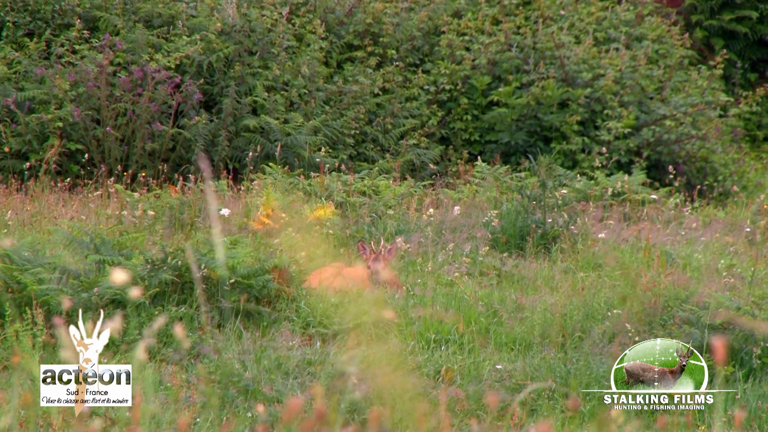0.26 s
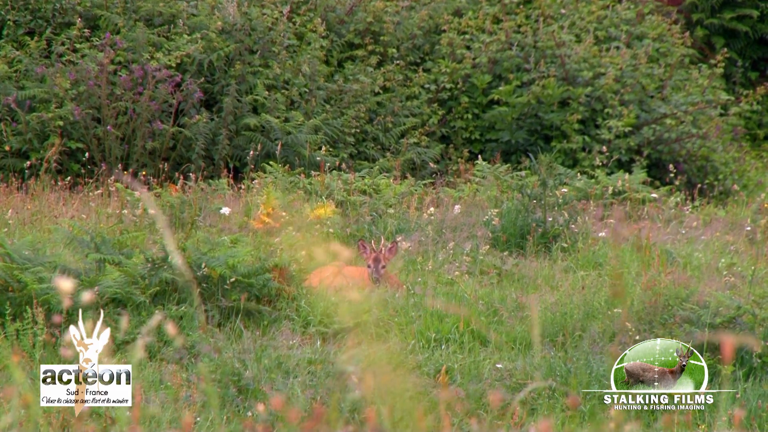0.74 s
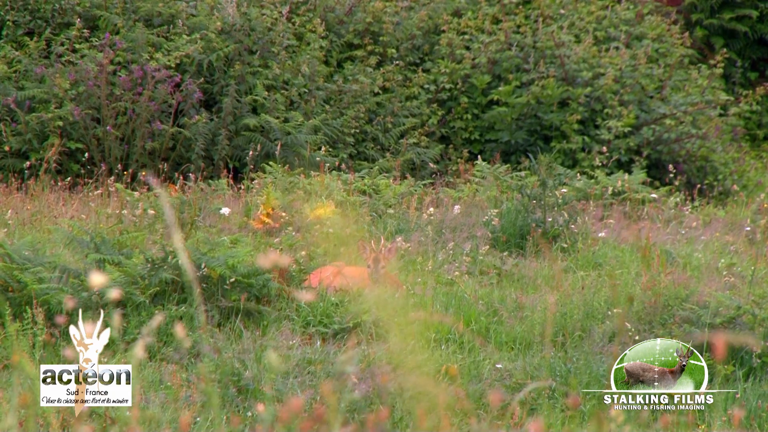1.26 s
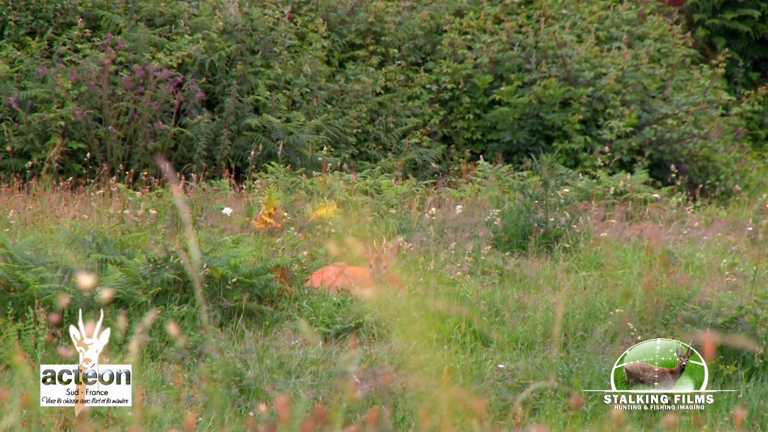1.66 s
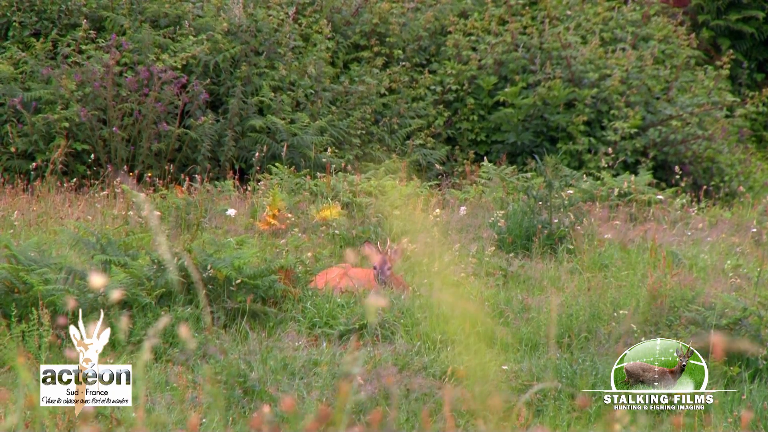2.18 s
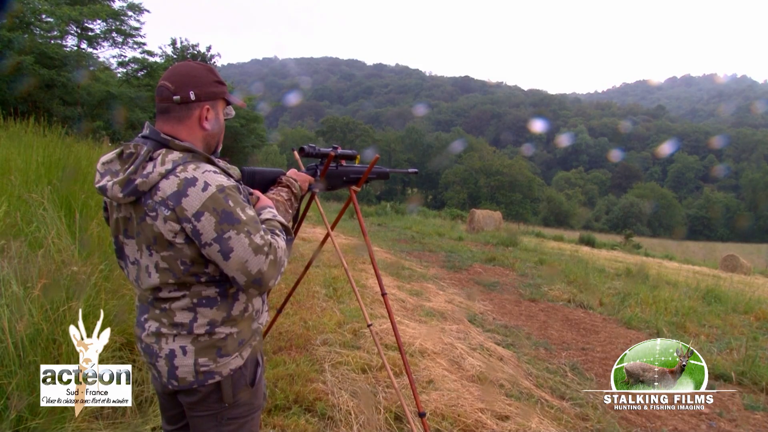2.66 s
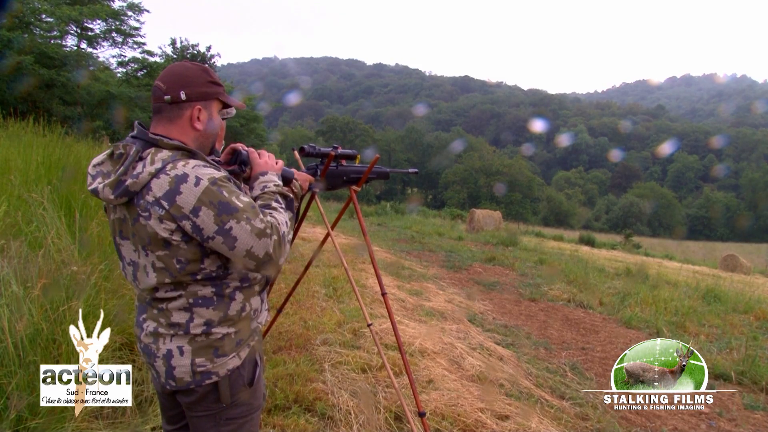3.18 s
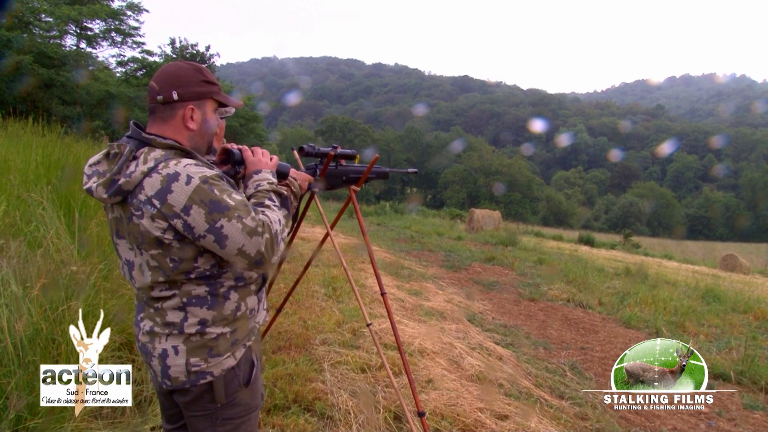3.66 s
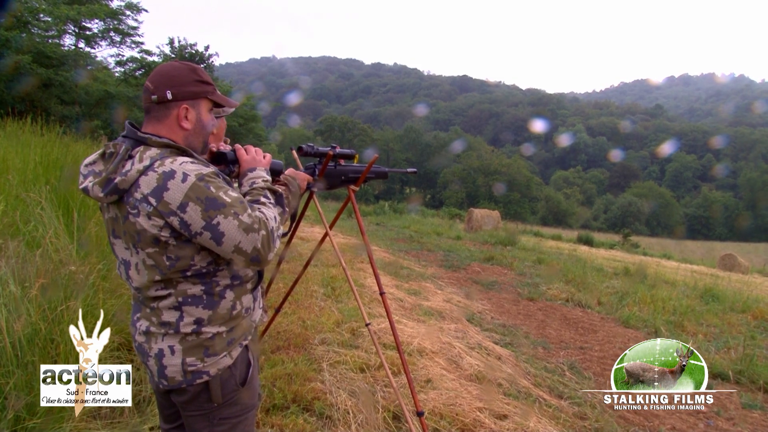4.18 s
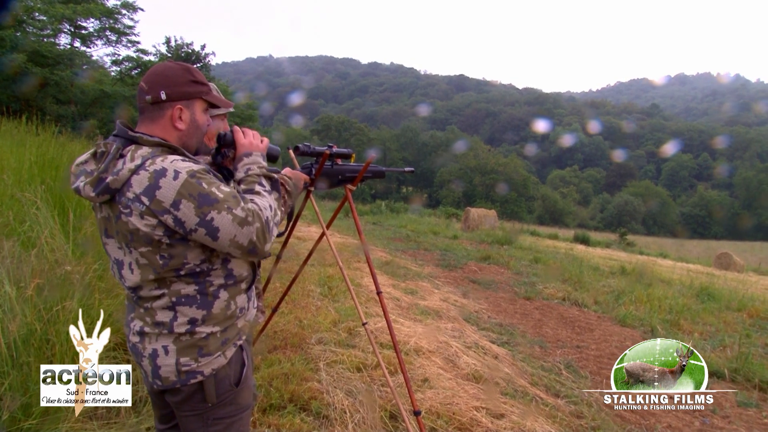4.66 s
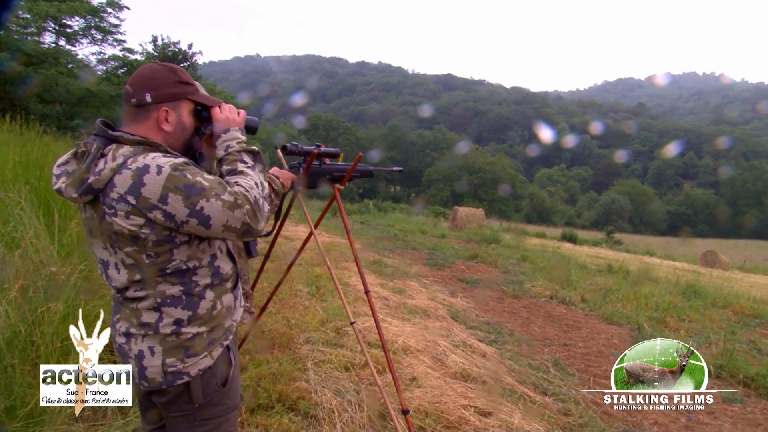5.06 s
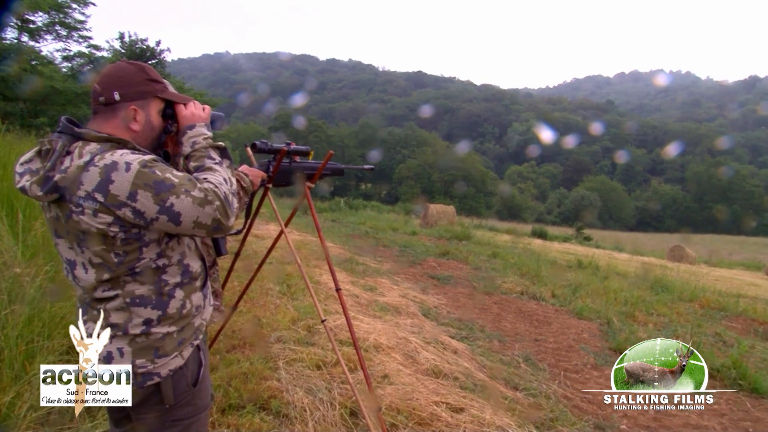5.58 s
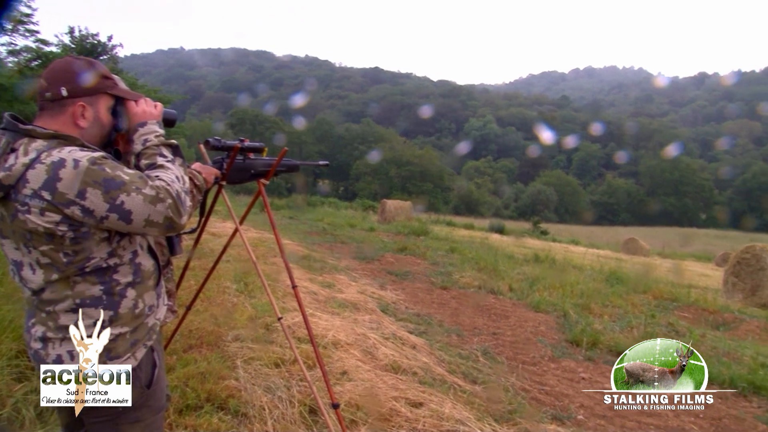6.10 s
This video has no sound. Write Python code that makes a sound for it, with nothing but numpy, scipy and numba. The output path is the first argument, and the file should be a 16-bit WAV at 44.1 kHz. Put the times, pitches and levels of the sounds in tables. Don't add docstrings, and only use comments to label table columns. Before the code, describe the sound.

Two hoarse deer barks a second apart, small birds whistling, then a cut to a hushed hillside with light drizzle tapping and far birdsong.

```python
import sys
import numpy as np
from scipy import signal
from scipy.fft import rfft, irfft, next_fast_len
from scipy.io import wavfile
from scipy.ndimage import uniform_filter1d
from numba import njit

SR = 44100
rng = np.random.default_rng(int(sys.argv[2]) if len(sys.argv) > 2 else 0)


def dump_mix(stems):
    frames = np.atleast_2d(stems).T
    limited = np.clip(frames, -1, 1)
    pcm = np.round(limited * 32767).astype(np.int16)
    wavfile.write(sys.argv[1], SR, pcm)


def decibels_to_gain(level_db):
    exponent = np.asarray(level_db, float) / 20
    return 10 ** exponent


N = 279594
T = np.arange(N) / SR
CHANGE_S = 2.421


def level(x, db):
    return x * decibels_to_gain(db) / np.sqrt(np.mean(x ** 2))


@njit
def svf(x, g, k):
    y, b, l = np.empty(len(x)), 0., 0.
    for i in range(len(x)):
        v = (b + g[i] * (x[i] - l)) / (1 + g[i] * (g[i] + k[i]))
        b, l, y[i] = 2 * v - b, l + 2 * g[i] * v, k[i] * v
    return y


def band(x, hz, width):
    flat = np.zeros(len(x))
    g, k = flat + np.tan(np.pi * hz / SR), flat + width / hz
    return svf(svf(x, g, k), g, k)


def body(x, modes):
    out = np.zeros(len(x))
    for k, (hz, width, db) in enumerate(modes):
        out += (-1) ** k * decibels_to_gain(db) * band(x, hz, width)
    return out


def walk(rate, size=N):
    hold = int(SR / rate)
    steps = np.repeat(rng.standard_normal(size // hold + 1), hold)
    return 1.3 * uniform_filter1d(uniform_filter1d(steps, hold), hold)[:size]


def read(rows, t):
    s, *columns = np.transpose(rows)
    gate = np.clip(np.minimum(t - s[0], s[-1] - t) / 0.0021, 0, 1)
    return gate, [np.interp(t, s, c) for c in columns]


def span(rows):
    return np.arange(max(int(rows[0][0] * SR), 0), min(int(rows[-1][0] * SR), N))


def turn(hz):
    return 2 * np.pi * np.cumsum(hz) / SR


def pan(x, db):
    return x * decibels_to_gain(np.array([[db / 2], [-db / 2]]))


def echo(x, t60, wet_db):
    t = T[:int(t60 * SR)]
    fade = np.exp(-np.log(1000) * t / t60) * np.clip(t / 0.0065, 0, 1)
    tail = rng.standard_normal((2, len(t))) * fade
    tail = tail / np.sqrt(np.sum(tail[0] ** 2))
    return decibels_to_gain(wet_db) * signal.fftconvolve(x[None], tail, axes=1)[:, :N]


def sing(rows, attack_s, release_s, fade_db, arch_hz, early, waver):
    out = np.zeros(N)
    for s, length_s, first_hz, last_hz, db in rows:
        i = span([(s,), (s + length_s,)])
        t = T[i] - s
        part = np.clip(t / length_s, 0, 1)
        hz = last_hz + (first_hz - last_hz) * (1 - part) ** early + arch_hz * np.sin(np.pi * part)
        phase = turn(hz * (1 + waver * walk(110, size=len(i))))
        edge = np.clip(1 - np.minimum(t / attack_s, (length_s - t) / release_s), 0, 1)
        edge_db = -14.5 * edge ** 2
        note_db = db + 1.9 * walk(70, size=len(i)) + fade_db * part + edge_db
        out[i] += decibels_to_gain(note_db) * np.sqrt(2) * np.sin(phase)
    return out


# t/s, level over the voice/dB
FOLD_SLAPS = [
    (.0295, 22.5),
    (.078, 23),
    (1.0915, 29.5),
    (1.121, 24.5),
]


def deer_larynx(t, a, b, rough):
    pulses = sum(m ** -.3 * np.cos(m * (a + 0.16 * np.sin(b))) for m in range(1, 14))
    pulses = pulses * (0.36 + .9 * np.cos(b) + 0.54 * np.cos(2 * b + 1.87))
    breath = rng.standard_normal(len(t)) * (1 + 0.78 * np.cos(a))
    shimmer = decibels_to_gain(5.5 * rough * walk(120, size=len(t)))
    closures = level(pulses, 0) * shimmer
    for s, db in FOLD_SLAPS:
        closures = closures - decibels_to_gain(db) * np.exp(-((t - s) / .00005) ** 2)
    return closures, breath, shimmer


# f/Hz, width/Hz, level/dB
THROAT_MODES = [(162, 200, -24.5), (366, 260, -3.5), (596, 205, 2.5), (775, 133, -3)]
# f/Hz, width/Hz, level/dB
NOSE_MODES = [(1570, 260, 5.5), (2250, 460, 1.5), (2760, 360, 4)]


def deer_bark(t, folds, flap):
    gate, (hz, effort_db, opening) = read(folds, t)
    flap_gate, (flap_hz, flap_db) = read(flap, t)
    size = len(t)
    shut = np.clip(1 - opening, 0, 1)
    rough = 0.23 + 0.10 * shut
    a = turn(hz * (1 + .055 * rough * walk(150, size=size)))
    b = turn(flap_hz * (1 + .006 * walk(60, size=size)))
    closures, breath, shimmer = deer_larynx(t, a, b, rough)
    hiss = level(band(breath, 1300, 4200), 6.5)
    voice = np.sqrt(1 - rough) * closures + np.sqrt(rough) * hiss

    low_db = -35 + 0.31 * (effort_db + 35) - 25 * shut
    octave_db = effort_db + 11.5 - 0.1111 * abs(2 * hz - 490.5)
    folds_tone = (decibels_to_gain(low_db) * np.cos(a) + decibels_to_gain(octave_db) * np.cos(2 * a)) * np.sqrt(shimmer)
    flap_tone = flap_gate * decibels_to_gain(flap_db + 1.6 * walk(80, size=size)) * np.cos(b)
    throat = level(body(voice, THROAT_MODES), 2.3) * decibels_to_gain(effort_db)
    throat = throat + level(band(breath, 180, 100), -20.5) * decibels_to_gain(low_db)

    mouth_hz = 1188 - 101 * shut
    mouth = level(band(band(voice, mouth_hz, 340), mouth_hz, 260), -2.4) * decibels_to_gain(effort_db)

    nasal = body(closures + np.sqrt(0.074) * hiss, NOSE_MODES)
    nasal = nasal - band(nasal, 1854, 560)
    nasal = signal.sosfilt(signal.butter(6, 3150, fs=SR, output="sos"), nasal)
    nose_db = effort_db - 20 - 7.5 * shut
    nose = (level(nasal, 4.5) + level(band(breath, 6000, 2500), -27.0)) * decibels_to_gain(nose_db)
    return gate * (np.sqrt(2) * (folds_tone + flap_tone) + throat), gate * (nose - mouth)


# t/s, f/Hz, effort level/dB, mouth opening/0-1
BARK_FOLDS = [
    [(-.0003, 292.4, -30.5, 0.87), (.035, 289.7, -35, 0.94), (.064, 286.1, -37, 0.87),
     (.1, 280.8, -37.5, 0.88), (.125, 280.2, -39.5, 0.8), (.154, 273.3, -47.5, 0.4), (.182, 253.2, -49, 0),
     (.21, 242.4, -58, 0), (.25, 232.6, -100, .1)],
    [(.94, 222.3, -78, 0.48), (.982, 239.7, -71.5, 0.95), (1.004, 250.5, -41, 0.75),
     (1.062, 281.1, -34, 0.93), (1.125, 280.6, -37.5, 1), (1.185, 258.6, -35.5, 0.75),
     (1.255, 240.2, -40.5, 0.01), (1.3, 219.8, -49.5, 0), (1.35, 210, -81, .05)],
]
# t/s, f/Hz, level/dB
BARK_FLAP = [
    [(0, 492, -32.5), (0.034, 492, -28.5), (0.138, 497.3, -24.5), (0.19, 474.3, -30.5), (0.2, 477, -48.5),
     (0.25, 456.6, -78)],
    [(0.975, 459, -64), (.994, 464.5, -51.5), (1.006, 470.2, -28), (1.03, 469.7, -24), (1.082, 444.2, -36),
     (1.282, 440, -27), (1.305, 462, -56), (1.325, 463, -47), (1.35, 465, -82)],
]
# t/s, length/s, first f/Hz, last f/Hz, level/dB
MOUTH_RING = [
    (-.01, .17, 1262, 1280, -28.5),
    (1.02, 0.19, 1265, 1600, -31),
    (.15, 0.074, 1130, 1030, -41),
    (1.18, 0.14, 1120, 910, -39.5),
]


def deer():
    chest = np.zeros(N)
    face = sing(MOUTH_RING, attack_s=0.1, release_s=0.1, fade_db=-7.5, arch_hz=18, early=0.02, waver=0.005)
    for folds, flap in zip(BARK_FOLDS, BARK_FLAP):
        i = span(folds)
        from_chest, from_face = deer_bark(T[i], folds, flap)
        chest[i] += from_chest
        face[i] += from_face
    face_pair = pan(face, 2.0)
    face_pair[1] = np.roll(face_pair[1], shift=3)
    return pan(chest, -1.2) + face_pair + echo(chest, .12, -18) + echo(face, 0.14, -8.5)


# t/s, length/s, first f/Hz, last f/Hz, level/dB
LOW_SONG = [(.718, .03, 3180, 2740, -66.5), (.738, 0.049, 2793, 2870, -56.5), (.768, .042, 2902, 2610, -56),
            (.9, 0.039, 3106, 2610, -56.5), (1.035, 0.055, 2680, 2880, -54.5),
            (1.575, 0.11, 2840, 3070, -65), (1.63, 0.055, 3050, 2686, -57.5),
            (1.89, 0.048, 2584, 2870, -54), (1.938, 0.034, 3070, 2920, -55), (1.975, 0.03, 2910, 2910, -60),
            (2.203, 0.038, 2595, 2820, -51), (2.27, 0.053, 2920, 2857, -62),
            (1.875, 0.046, 2300, 2650, -63),
    (2.187, .03, 2380, 2400, -66),
    (2.25, .025, 3400, 2950, -58),
    (.95, 0.046, 2500, 2760, -68.5),
]
# t/s, length/s, first f/Hz, last f/Hz, level/dB
HIGH_REPLY = [(1.228, 0.096, 3642, 3478, -62), (1.3, 0.068, 3502, 3557, -63),
              (1.436, 0.077, 3910, 3546, -63.5), (1.748, 0.045, 3850, 3330, -61),
              (1.786, 0.025, 3214, 3040, -62), (2.06, 0.048, 3940, 3310, -59.5),
              (2.1, 0.078, 3240, 3220, -70), (2.362, 0.062, 4100, 3110, -59.5)]


def hedge_birds():
    song = sing(LOW_SONG, attack_s=.024, release_s=.022, fade_db=0.73, arch_hz=63, early=1.5, waver=.006)
    reply = sing(HIGH_REPLY, attack_s=.014, release_s=0.009, fade_db=1.26, arch_hz=29, early=1.3, waver=0.0053)
    both = song + reply
    return pan(song, 2.7) + pan(reply, -2.5) + echo(both, 0.78, -6) + echo(both, .15, -7.5)


# t/s, f/Hz, level/dB
SQUEAK_CURVE = [(3.845, 1755, -97), (3.862, 1885, -69), (3.9, 1912, -66.5), (3.965, 1914, -67),
                (4.028, 1860, -74), (4.038, 1828, -69), (4.1, 1786, -74.5), (4.135, 1765, -84),
                (4.16, 1750, -100)]
# multiple of the pitch, level/dB
REED_OVERTONES = [(1, 0), (2, -4), (3, 1), (4, -8.5), (5, -30), (6, -31)]


def reedy_squeak():
    squeak = np.zeros(N)
    i = span(SQUEAK_CURVE)
    gate, (hz, db) = read(SQUEAK_CURVE, T[i])
    phase = turn(hz * (1 + 0.0021 * walk(111, size=len(i))))
    reed = sum(decibels_to_gain(gain_db) * np.sin(m * phase) for m, gain_db in REED_OVERTONES)
    squeak[i] = gate * decibels_to_gain(db) * np.sqrt(2) * reed
    return pan(squeak, 2.6) + echo(squeak, 0.2, -2)


# t/s, length/s, first f/Hz, last f/Hz, level/dB
SLURS = [(2.52, 0.1, 1560, 1460, -80), (2.6, 0.065, 2700, 3330, -83), (2.76, 0.22, 2060, 1983, -80.5),
         (2.91, 0.1, 1650, 2100, -75.5), (3.01, 0.072, 2310, 2060, -75.5), (3.04, 0.034, 1810, 1520, -72),
         (3.085, 0.037, 1810, 1540, -73), (3.125, 0.04, 1926, 1510, -71), (3.16, 0.042, 1800, 1505, -73.5),
         (3.195, 0.044, 1755, 1560, -78), (3.275, 0.064, 2250, 2050, -71),
         (3.325, 0.109, 2058, 2166, -74.5), (3.35, .055, 2000, 1613, -74.5), (3.61, 0.043, 3300, 2890, -81),
         (3.51, 0.064, 1984, 1924, -76), (3.94, 0.054, 1520, 1440, -72), (4.08, 0.058, 2735, 2770, -83.5),
         (4.13, 0.069, 2130, 2170, -81), (4.41, 0.1, 1980, 1960, -77), (4.78, 0.15, 2710, 3810, -86),
         (5.45, 0.062, 2300, 2300, -86.5), (5.795, 0.1, 2780, 3620, -81), (5.79, 0.089, 2300, 2290, -81.5),
         (6.1, 0.088, 2680, 2550, -93)]
# t/s, length/s, first f/Hz, last f/Hz, level/dB
FLUTING = [(2.72, 0.11, 2770, 2370, -69), (2.82, 0.17, 2480, 2510, -75), (2.63, 0.1, 1760, 1780, -70.5),
           (3.41, 0.077, 3220, 2820, -70.5), (3.55, 0.18, 2515, 2480, -71.5), (3.58, 0.16, 2100, 2200, -69),
           (3.57, 0.22, 1466, 1520, -79.5), (3.98, 0.098, 2200, 2070, -65), (4.34, 0.076, 2030, 2020, -68),
           (4.51, 0.115, 2105, 2215, -68), (5.03, 0.12, 2930, 2620, -79)]
# t/s, length/s, first f/Hz, last f/Hz, level/dB
WARBLES = [(4.19, .11, 1600, 1580, -71.5), (4.255, .08, 2800, 2150, -68.5), (4.0, .1, 2350, 2800, -71.5),
           (4.555, 0.066, 4700, 2700, -79), (4.66, .04, 4350, 4300, -86), (2.67, 0.065, 2750, 2780, -80),
           (3.04, 0.058, 2500, 3200, -79.5), (3.24, 0.053, 2500, 2800, -75), (3.1, .06, 3500, 2880, -78),
           (3.43, 0.042, 2250, 2330, -76), (3.05, .1, 5100, 3800, -84), (2.52, 0.059, 2330, 2420, -84),
           (4.72, .07, 2050, 2600, -80.5), (4.3, .06, 2400, 2600, -78), (4.72, .05, 2600, 1900, -82),
           (3.4, 0.092, 3100, 2600, -78)]


def distant_birds():
    slurs = sing(SLURS, attack_s=.012, release_s=.025, fade_db=-2, arch_hz=4, early=1.3, waver=.006)
    flute = sing(FLUTING, attack_s=-0.4, release_s=-0.07, fade_db=-1, arch_hz=151, early=1.4, waver=0.0031)
    warbler = sing(WARBLES, attack_s=.012, release_s=.02, fade_db=-1, arch_hz=4, early=1, waver=.018)
    far = decibels_to_gain(2.5) * slurs + flute + warbler
    return decibels_to_gain(-0.7) * pan(far, 1.7) + echo(far, 0.51, -1.8)


CHIRP_TIMES = [0.221, 0.618, 1.019, 1.414, 1.848, 2.279]


def near_cricket():
    near = np.zeros(N)
    t = T[:int(.022 * SR)]
    stroke = np.sin(turn(4720 - 27000 * t)) * np.sin(np.pi * t / t[-1])
    for s in CHIRP_TIMES:
        effort_db = 1.5 * rng.standard_normal()
        for k, db in enumerate((-82, -77, -78)):
            i = int((s + 0.037 * k) * SR)
            near[i:i + len(t)] += decibels_to_gain(db + effort_db) * stroke * decibels_to_gain(4.0 * walk(300, size=len(t)))
    return pan(near, 1.5)


def add_drop(out, s, db, snap_db, pan_db, pitch):
    t = T[:int(.008 * SR)]
    cycles = pitch * t * np.array([[1500], [3300], [7000], [550]])
    tick, snap, crack, thud = np.sin(2 * np.pi * cycles) * cycles ** 1.656 * np.exp(-cycles * 3.55)
    bright = decibels_to_gain(snap_db + 9.5) * (snap + decibels_to_gain(-14) * crack)
    drop = decibels_to_gain(db + 28.5) * (tick + bright + decibels_to_gain(-4.0) * thud)
    for side, gain in enumerate(pan(0.91, pan_db)[:, 0]):
        i = int(s * SR + 3 + (side - .5) * pan_db * 1.6)
        out[side, i:i + len(t)] += gain * drop


# t/s, peak level/dB, snap minus peak level/dB, left minus right level/dB
BIG_DROPS = [(.1034, -60.5, -8, 1.5), (.1265, -60, -5, 1), (1.0137, -63, -3, 0), (5.2075, -63.5, 0.5, 1),
             (.2658, -53.5, -4, 1.5), (.3237, -51, -40, 1), (1.325, -53.5, -17.5, 0.5),
             (1.4514, -46, -23, 2.5), (2.0368, -51, -7.5, 8.5), (2.2602, -61, 2, 11),
             (2.6768, -49.5, -11, -2), (2.6938, -44, -16, -2), (2.7927, -51.5, -13, 5),
             (2.836, -51.5, -15, 3.5), (2.9596, -52.5, -11, 2), (2.9903, -53.5, -8, -3.5),
             (3.2372, -48.5, -13, 5), (3.4251, -46, -23, -2.5), (3.7144, -51, -14.5, 0.5),
             (3.9678, -50.5, -25, -0.5), (4.2961, -53.5, -10, -2), (4.3767, -48, -15, 0.5),
             (4.512, -56.5, -20, 1), (4.5341, -52, -19, 3.5), (4.9705, -48, -30, -2.5),
             (5.1365, -53, -13, 0.5), (5.1625, -58, -21, 4), (5.177, -51, -12, 0.5), (5.2817, -51, -23, 2),
             (5.353, -57.5, -22, 3), (5.6527, -56, -20, -2.5), (5.7428, -49.5, -21, -3),
             (6.137, -54, -11, 0)]
# t/s, peak level/dB, f/Hz, left minus right level/dB
SMALL_DROPS = [(0.2254, -57, 2800, -1), (0.3037, -59, 2400, 0.5), (0.3481, -58, 2460, -0.5),
               (0.428, -69, 1740, 5), (0.4818, -56, 1650, 6), (0.6444, -60.5, 2400, 2),
               (0.7204, -66, 2860, 4), (0.8466, -58, 2760, 1.5), (0.9113, -53, 2760, 4.5),
               (0.964, -57.5, 2680, 1), (1.4095, -58, 3560, 1), (1.5454, -62, 3610, 3.5),
               (1.5704, -64, 2920, -1), (1.6014, -54, 2970, 2), (2.0774, -57, 3620, 0),
               (2.4875, -56, 2500, 2.5), (2.6303, -60, 1850, 2.5), (3.2744, -62, 2190, 0),
               (3.4462, -59, 2330, 0), (3.4914, -61.5, 2870, 0.5), (3.5533, -68, 2570, 3),
               (3.7435, -63, 2350, 2), (3.8816, -52.5, 5720, 1.5), (3.9309, -52.5, 5740, 1.5),
               (4.0702, -54, 5340, -1.0), (4.1794, -57, 2150, -2), (4.2134, -62, 1700, -3),
               (4.3194, -58, 2300, 1), (4.344, -60, 2130, 1), (4.4079, -69, 1960, 4.5),
               (4.5704, -61, 2270, 2.5), (4.6424, -66, 2280, 5), (4.7537, -60, 2080, 0.5),
               (4.8253, -67, 1640, 0.5), (4.8764, -69, 1610, -1), (4.9132, -68, 2570, 0),
               (4.938, -72, 1660, -1.0), (4.9952, -64, 2040, 1), (5.03, -60, 2350, -0.5),
               (5.0539, -61.5, 1620, -3), (5.1899, -52.5, 2320, 2.5), (5.2071, -57, 2120, 7),
               (5.24, -70, 4380, 3), (5.3888, -62, 1690, -0.5), (5.5038, -61, 1770, -2.0),
               (5.5538, -60, 2030, 2.5), (5.569, -65, 1660, 0), (5.6364, -69, 1600, 0),
               (5.8109, -55.5, 2300, -1.5), (6.0353, -58.5, 1600, 0)]


def drizzle():
    out = np.zeros((2, N + SR))
    for when, size, snap, place in rng.random((1100, 4)):
        db = -71 + min(-11 * np.log10(1 - size), 9)
        add_drop(out, when * T[-1], db, -9 - 16 * snap, 7.0 * (place - .5), 0.74 + 0.82 * rng.random())
    for s, db, snap_db, pan_db in BIG_DROPS:
        add_drop(out, s, db, snap_db, pan_db, 0.74 + 0.82 * rng.random())
    for s, db, hz, pan_db in SMALL_DROPS:
        add_drop(out, s, db + 3.0, -14, pan_db, hz / 1700)
    return out[:, :N]


# t/s, peak level/dB, ring f/Hz, decay/s
SHELL_BUMPS = [(2.406, -45.5, 318, 0.013), (2.461, -35.5, 680, 0.0085), (3.61, -59, 192, 0.04),
               (4.092, -57, 210, 0.042), (4.268, -53.5, 202, 0.035), (4.651, -54, 181, 0.049),
               (5.207, -53, 214, 0.068), (5.322, -50.5, 208, 0.042), (5.482, -52.5, 215, 0.037),
               (4.64, -57, 700, .015), (5.163, -54, 1200, .012), (5.652, -55.5, 1080, 0.015)]


def bumps():
    out = np.zeros(N + SR)
    t = T[:int(.1 * SR)]
    for s, db, hz, t60 in SHELL_BUMPS:
        i = int(s * SR)
        out[i:i + len(t)] += decibels_to_gain(db + 0.5) * np.sin(2 * np.pi * hz * t) * np.exp(-np.log(1000) * t / t60)
    return out[:N]


# f/Hz, width/Hz, level/dB
MOTOR_MODES = [(210, 74, -11), (336, 120, -0.5), (511, 49, -3), (710.5, 47, -2), (1008, 120, -3),
               (1440, 270, -13)]
# t/s, level/dB
MOTOR_LOAD = [(0, -4.5), (.5, 1.5), (.9, -1.5), (1.5, -1.5), (2.0, 0), (2.25, -4.5), (2.42, -6)]


def focus_motor():
    bursts = decibels_to_gain(6.0 * np.sin(turn(18 + 2.5 * walk(3))) + 1.5 * walk(25))
    teeth = np.exp(2.5 * np.cos(turn(56 + 7.0 * walk(20))))
    rattle = rng.standard_normal(N) * bursts * (teeth + 2.3)
    load_db = np.interp(T, *np.transpose(MOTOR_LOAD))
    return level(body(rattle, MOTOR_MODES), -65.0) * decibels_to_gain(load_db)


# f/Hz, width/Hz, level/dB
GEAR_MODES = [(294, 71, 5), (1020, 420, -17), (1200, 320, -11)]


def focus_gear():
    steps = np.zeros(N)
    at = np.arange(5.786, T[-1] - .01, .03992)
    chance = rng.standard_normal((len(at), 2))
    steps[(at * SR).astype(int)] = decibels_to_gain(1.2 * chance[:, 0])
    steps[((at + .0035) * SR).astype(int)] = -.6 * decibels_to_gain(1.5 * chance[:, 1])
    return level(body(steps, GEAR_MODES), -77.5)


def cricket_chorus():
    throb = decibels_to_gain(4 * np.sin(turn(24 + 4 * walk(5))) + 2 * walk(7))
    sides = [level(band(rng.standard_normal(N) * throb, 4440, 330), -88.0) for _ in range(2)]
    chorus = np.array(sides)
    return chorus + 0.7 * chorus[::-1]


def air(shape, db, start, stop):
    size = next_fast_len(stop - start)
    swell = walk(0.6, size=size)
    noise = rfft(rng.standard_normal((2, size)))
    octave = np.log2(np.arange(1, noise.shape[1] + 1) * SR / size)
    shape_hz, shape_db = np.transpose(shape)
    noise = noise * decibels_to_gain(np.interp(octave, np.log2(shape_hz), shape_db))
    out = 0
    for centre in np.arange(4, 14.5, .5):
        hz = 2 ** centre
        share = np.sqrt(np.clip(1 - 2 * abs(octave - centre), 0, 1))
        mid, side = irfft(noise * share, size)
        flicker_db = swell + 0.63 * min(1, 300 / hz) ** .4 * walk(11, size=size)
        width = min(0.2 + hz / 9000, .45)
        out = out + decibels_to_gain(flicker_db) * (mid + width * side * np.array([[1], [-1]]))
    return np.pad(level(out, db)[:, :stop - start], [(0, 0), (start, N - stop)])


# f/Hz, level per Hz/dB
MEADOW_COLOUR = [(15, -34), (25, -3), (160, -4), (340, -5.5), (743, -6.5), (850, -13.5), (999, -6),
                 (1210, -15.5), (1900, -23.5), (2850, -20.5), (15600, -51.5)]


def meadow_air():
    return air(MEADOW_COLOUR, -66.5, start=0, stop=int(CHANGE_S * SR))


# f/Hz, level per Hz/dB
HILL_COLOUR = [(15, -25), (25, 4), (91, 1), (331, -5), (685, -11), (805, -17.5), (972, -6), (1140, -18.5),
               (1310, -10), (1810, -25), (2780, -16.5), (3540, -29.5), (4390, -24.5), (4890, -26),
               (15600, -47)]


def hill_air():
    return air(HILL_COLOUR, -68, start=int(CHANGE_S * SR) - 200, stop=N)


def scene():
    before = np.clip((CHANGE_S - T) / 0.0016, 0, 1)
    chorus = cricket_chorus()
    meadow = deer() + hedge_birds() + near_cricket() + focus_motor() + decibels_to_gain(-10.5) * chorus + meadow_air()
    hill = reedy_squeak() + distant_birds() + focus_gear() + chorus + hill_air()
    return before * meadow + (1 - before) * hill + drizzle() + bumps()


def roll_off(x):
    return signal.sosfilt(signal.butter(12, 15710, fs=SR, output="sos"), x)


def record(dry):
    return roll_off(dry)


dry = scene()
out = record(dry)
dump_mix(out)
```